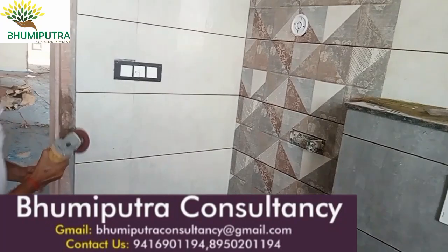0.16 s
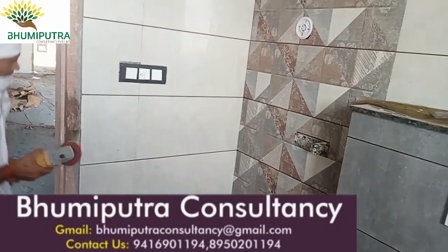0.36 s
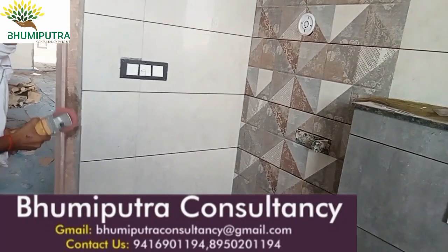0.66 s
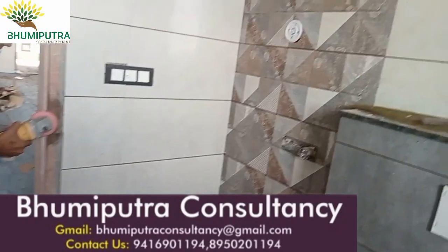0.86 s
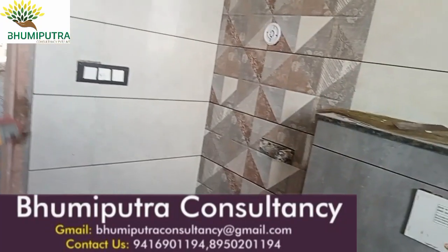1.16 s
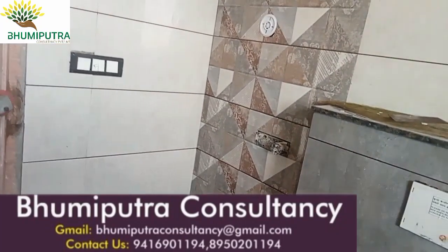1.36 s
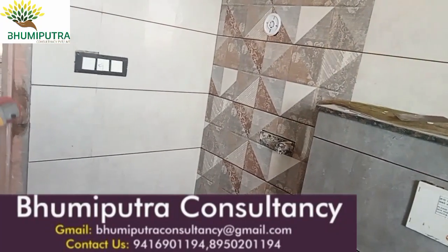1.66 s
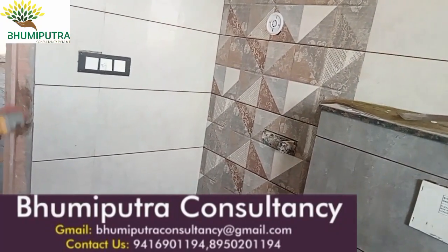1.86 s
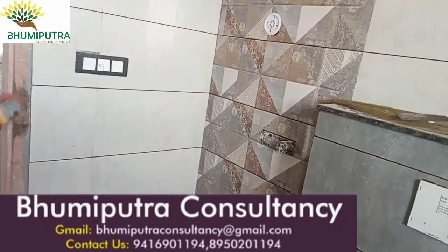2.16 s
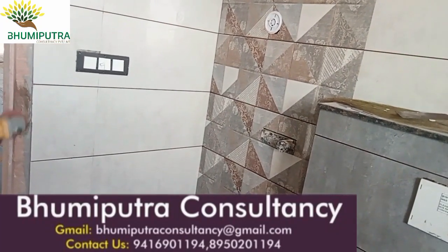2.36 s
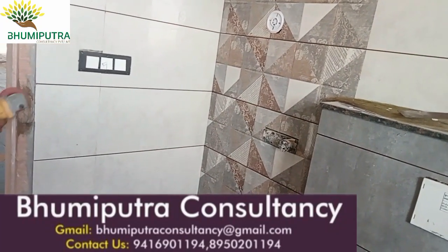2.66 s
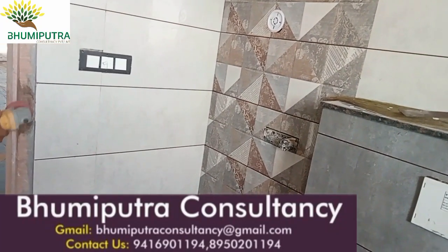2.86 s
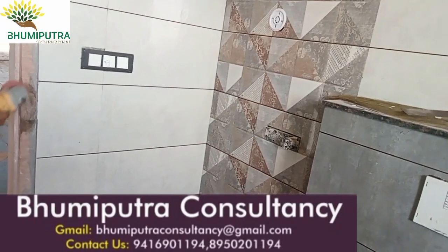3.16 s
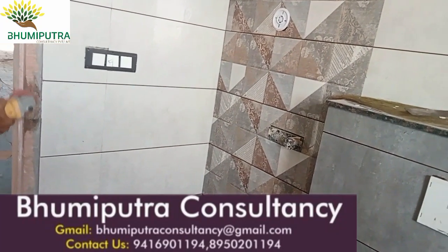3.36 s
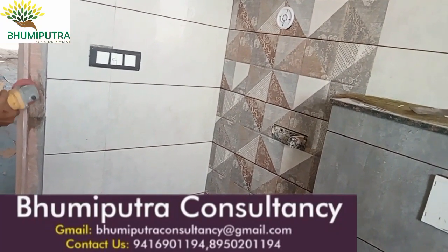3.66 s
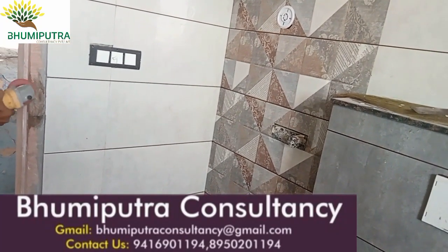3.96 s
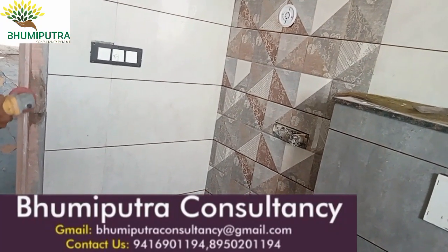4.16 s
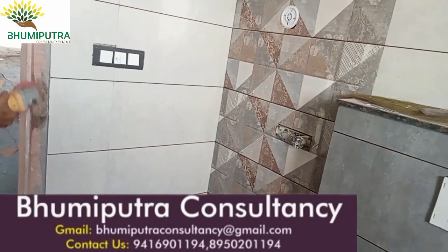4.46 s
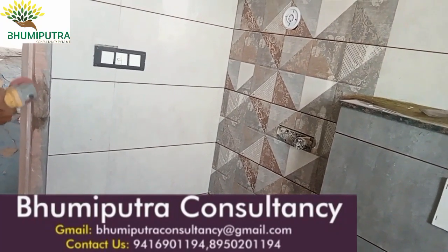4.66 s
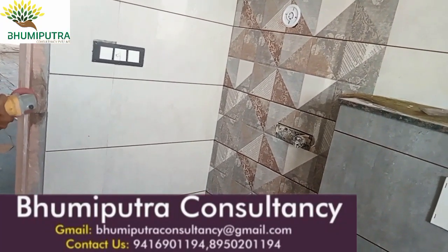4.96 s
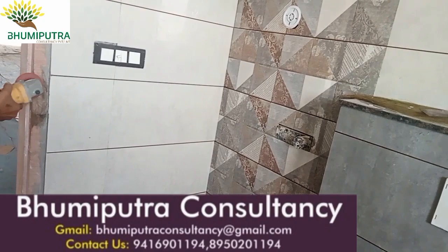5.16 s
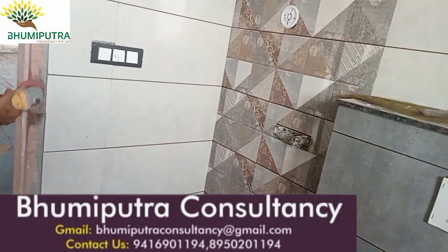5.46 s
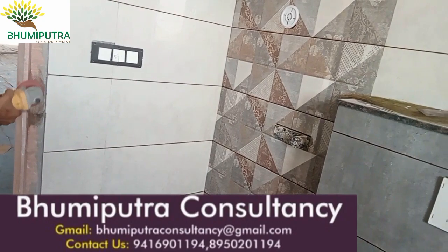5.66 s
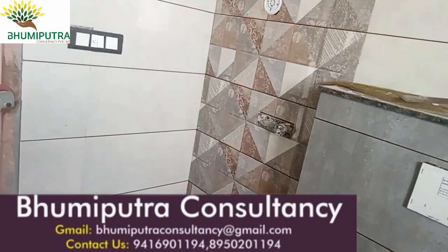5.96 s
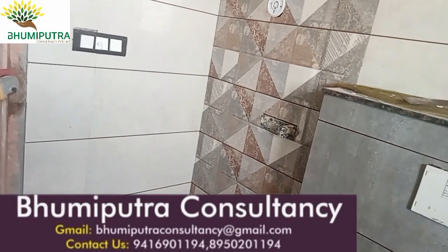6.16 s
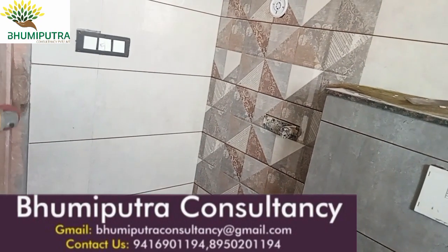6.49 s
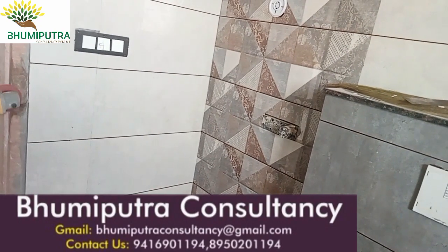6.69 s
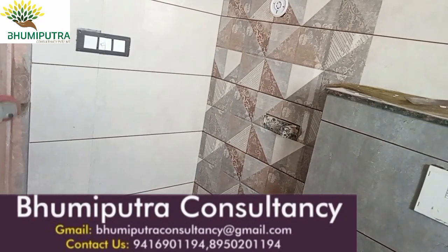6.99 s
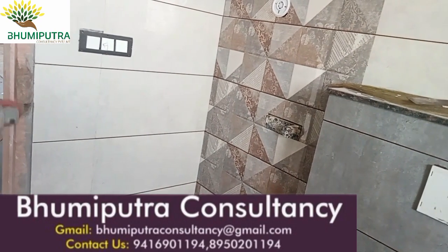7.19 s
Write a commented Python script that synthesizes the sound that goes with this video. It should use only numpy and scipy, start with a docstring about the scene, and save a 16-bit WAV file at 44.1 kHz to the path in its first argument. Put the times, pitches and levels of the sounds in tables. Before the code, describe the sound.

A harsh, hissing rasp of an abrasive disc on stone rings in a hard-walled room. The angle grinder's motor whines and squeals at first, then drops in pitch and recedes under load. The grinding swells with each push as irregular gusts rumble and thump on the nearby microphone. Late on, everything drops to silence for half a second before the grinding resumes.

```python
"""An angle grinder on a stone door frame in a tiled room, a metre or two from a handheld microphone.
From the start grit rasps on the stone and rings the disc, the motor whines and squeals, and air thrown
off the disc buffets the microphone in gusts. About a second and a half in, the disc bites behind the
frame's edge: the whine sags and fades, and the grinding surges with each push of the hand.
Near the end the sound cuts out for half a second, then the grinding is back."""
import sys
import numpy as np
from scipy import signal
from scipy.fft import rfft, irfft, next_fast_len
from scipy.io import wavfile
from scipy.ndimage import uniform_filter1d, map_coordinates

SR = 44100
rng = np.random.default_rng(int(sys.argv[2]) if len(sys.argv) > 2 else 0)


def inscribe(sig):
    """Save sig as 16-bit PCM at rate SR to the path in sys.argv[1].

    A 1-D sig is mono; a 2-D sig holds one channel per row.
    Samples are clipped to [-1, 1] before scaling.
    """
    pcm = np.round(np.clip(np.atleast_2d(sig).T, -1, 1) * 32767)
    wavfile.write(sys.argv[1], SR, pcm.astype(np.int16))


N = 323253
PADDED = next_fast_len(N, True)
TIME, FREQS = np.arange(N) / SR, np.fft.rfftfreq(PADDED, 1 / SR)


# Pushes of the hand on the disc. Each row: centre in seconds, surge in dB (negative as it eases off),
# half-length in seconds, extra fizz in dB as the rim digs.
HAND_PUSHES = [(.16, -1.5, .1, 1), (0.374, -0.3, .15, 0), (0.725, 0, 0.14, 1), (.94, 1, 0.19, 0),
               (1.136, 2, 0.038, -1.5), (1.24, -2, 0.063, 3), (1.435, 0.8, 0.078, 0.5),
               (1.587, 3, 0.089, -2.5), (1.77, 3, 0.1, -2.5), (1.996, 2, .07, 0.5), (2.165, 1.3, .06, -0.5),
               (2.474, 2, 0.16, 0.5), (2.8, 0.5, .06, -0.5), (2.982, 2.5, 0.18, -1.7), (3.215, 1, 0.076, 0),
               (3.47, 3, 0.088, 0), (3.61, 1.5, .08, 0), (3.84, 2.6, 0.045, 0), (3.97, 3, .06, -1.5),
               (4.293, 1, .11, 1.5), (4.685, 2.2, 0.17, 0.5), (4.93, 3, 0.067, -1.5), (5.137, 2, 0.12, 0.5),
               (5.3, -1.5, .05, -1.5), (5.435, 1, 0.11, 1.5), (6.09, 3.5, 0.09, -1), (6.253, -1, .06, -1.3),
               (6.37, 1.5, .07, 2), (6.586, 1, .06, 2), (6.69, 1.5, 0.076, -3), (6.8, 0, 0.074, -2.5),
               (6.957, 1.5, 0.11, .7), (7.097, 1.5, 0.086, -1.5), (7.19, -.5, .05, -4.5),
               (7.28, 1, 0.047, 0.5)]
# Low to high: rasp of the stone, ring of the disc, fizz of the grit. Each row: base level in dB, share
# of the surge, change in dB when in view, share of the extra fizz, share of the skimming loss.
GRINDING_BANDS = [(-22, 0.71, 1.4, 0.33, 0.78), (-19, 0.97, -2, -.1, -0.82), (-23.5, .7, 2.2, 1, -0.098)]

def grinding(turns, tremor_db=.03, set_down_s=.66, settle_s=.022, skim_db=-2):
    """The disc skims the stone, is set down flat, then rasps, rings and fizzes with each push."""
    grit = screeching(tiled_room(grit_strikes(turns)))
    colour = grinding_colour()
    above_stone, above_disc = (1 / (1 + (edge_hz / (FREQS + 1)) ** 16) for edge_hz in (4000, 7000))
    bands = 1 - above_stone, above_stone - above_disc, above_disc
    surge = sum(db * swell(s, length) for s, db, length, _ in HAND_PUSHES) + tremor_db * wander(12)
    fizz = sum(db * swell(s, length) for s, _, length, db in HAND_PUSHES)
    skim = skim_db * (1 - np.tanh((TIME - set_down_s) / settle_s)) / 2
    out = np.zeros(N)
    for (db, surge_share, view_db, fizz_share, skim_share), band in zip(GRINDING_BANDS, bands):
        level_db = db + surge_share * surge + view_db * in_view() + fizz_share * fizz + skim_share * skim
        out += gain_of(level_db) * steadied(coloured(grit, colour * band), size=5000)
    return out


def grit_strikes(turns, wobble=.062, gear_ratio=2.6, chatter_db=-.3):
    """Grit hits the stone, a little harder once in each turn of the disc."""
    contact = 1 + wobble * np.sin(2 * np.pi * turns / gear_ratio)
    chatter = gain_of(chatter_db * wander(59))
    return impacts(per_s=28000, spread_db=.95) * contact * chatter


# Disc on stone from a metre or two away. Each row: frequency in Hz, relative level in dB.
GRINDING_SPECTRUM = [(300, -28), (700, -21.5), (1100, -14.5), (1700, -12), (2300, -3), (3000, -6),
                     (3800, -5.5), (5550, 1.5), (6200, -3), (6750, -10), (7700, -14), (8900, -11.5),
                     (11500, -20), (15400, -24.5)]
# Resonances of guard, disc and frame. Each row: frequency in Hz, width in Hz, lift in dB.
BODY_RESONANCES = [(1319, 53, 5), (2420, 90, 0.7), (3650, 870, -0.5), (4340, 170, 1), (5860, 110, 2),
                   (5730, 130, 0), (6170, 160, 3.5), (8880, 520, 2.5), (10060, 670, 3), (13000, 910, 5)]

def grinding_colour():
    """Gain at each frequency: a broad scrape with the ringing of guard, disc and frame on top."""
    ringing_db = sum(db / (1 + (2 * (FREQS - hz) / width) ** 2) for hz, width, db in BODY_RESONANCES)
    return gain_of(read(GRINDING_SPECTRUM, FREQS) + ringing_db)


# Resonances that come and go at the contact point. Each row: frequency in Hz, half-width in Hz,
# random swing in dB, change in dB when in view.
CONTACT_FLARES = [(1860, 200, 0, 3), (2380, 200, 0.9, -2), (5110, 350, 1, 0.5), (6100, 250, 0.6, -2),
                  (7000, 354, .5, 4.5), (8960, 220, 1.2, 2.5), (10150, 250, 2.3, -2)]

def screeching(grit, patchy_db=1.38, screech_db=.2, bite_db=3.5, bite_hz=5480, open_db=1.0):
    """As the contact point moves, resonances flare and fade and the strongest scrape roams in pitch."""
    hz, t, spectrum = signal.stft(grit, SR, nperseg=512, noverlap=384)
    hz = hz[:, None]
    view = in_view()
    patches = uniform_filter1d(rng.standard_normal(spectrum.shape), size=4, axis=0)
    patches = evened(uniform_filter1d(patches, size=16, axis=1))
    db = patches * (patchy_db + screech_db * np.exp(-((hz - 5600) / 900) ** 2))
    # the scrape sits lower on the near face of the frame
    centre_hz = bite_hz + 200 * wander(4) - 220 * view
    bite = np.exp(-((hz - np.interp(t, TIME, centre_hz)) / 380) ** 2)
    db += bite_db * (bite - bite.mean(1, keepdims=True))
    for flare_hz, width, swing_db, view_db in CONTACT_FLARES:
        flare_db = np.interp(t, TIME, swing_db * wander(9) + view_db * view)
        db += flare_db * np.exp(-((hz - flare_hz) / width) ** 2)
    # the highest fizz reaches the microphone only in a straight line, so the frame shades it
    db += open_db * np.interp(t, TIME, view) / (1 + (12500 / (hz + 1)) ** 10)
    return signal.istft(spectrum * gain_of(db), nperseg=512, noverlap=384)[1][:N]


# The tool as seen from the microphone. Each row: time in seconds, openness from 0 (hidden) to 1.
LINE_OF_SIGHT = [(0, 0.9), (.3, 0.45), (.7, 1), (1.1, 0.45), (1.45, 0.9), (1.7, 0), (7.33, 0.01)]

def in_view():
    """How openly the tool faces the microphone before it slips behind the frame."""
    return np.interp(TIME, *np.transpose(LINE_OF_SIGHT))


# Tones of the motor, led by its 24 commutator bars. Each row: multiple of the rotor speed,
# relative level in dB, flutter from 0 to 1.
MOTOR_TONES = [(23, -24, 0.7), (24, 0, 0.3), (26, -29.5, .7)]
# Brief squeals; on multiple 24 the whine itself flares. Each row: centre in seconds, multiple of the
# rotor speed, level in dB, half-length in seconds, flutter from 0 to 1.
ROTOR_SQUEALS = [(0.098, 24, -20.5, .03, .15), (.137, 18.1, -22.5, .04, .8), (0.228, 24, -24.5, .06, 0.2),
                 (0.389, 17.2, -24, .13, 1), (0.453, 23, -24, .06, .7), (.65, 24, -21, .05, .15),
                 (.755, 24, -23, .02, .15), (.835, 24, -23, .025, .15), (1.02, 24, -26, .03, .2),
                 (1.21, 24, -29.5, .04, .2)]

def motor(turns, hidden_db=-41, view_lift_db=17):
    """Whine and squeals locked to the rotor; the whine is loudest with the tool in view."""
    whine = sum(gain_of(db) * fluttering(order * turns, flutter, flutter_hz=25)
                for order, db, flutter in MOTOR_TONES)
    squeals = sum(gain_of(db) * swell(s, length) * fluttering(order * turns, flutter, flutter_hz=70)
                  for s, order, db, length, flutter in ROTOR_SQUEALS)
    return gain_of(hidden_db + view_lift_db * np.sqrt(in_view())) * whine + squeals


# Speed of the rotor. Each row: time in seconds, turns per second.
ROTOR_SPEED = [(0, 392.6), (.3, 395.9), (.6, 397.2), (1.17, 397.2), (1.3, 391), (1.43, 386), (1.55, 378),
               (1.9, 370), (3.8, 364), (7.33, 367)]

def rotor_turns(jitter=.0006):
    """Running count of turns as the rotor spins freely, then sags under load."""
    speed = np.interp(TIME, *np.transpose(ROTOR_SPEED))
    return np.cumsum(speed * (1 + jitter * wander(40))) / SR


# Air from the disc sweeping over the microphone. Each row: centre in seconds, relative level in dB,
# half-length in seconds.
AIR_GUSTS = [(0, -19, 0.067), (0.188, -22, 0.23), (0.344, -23, 0.04), (0.442, -22.5, 0.14),
             (0.654, -23, 0.075), (0.756, -22, 0.037), (0.864, -33.5, 0.13), (1.215, -24, 0.12),
             (1.352, -23, .06), (1.523, -32.5, 0.13), (2.08, -28, 0.036), (2.528, -21.5, 0.067),
             (2.635, -24.5, 0.064), (3.024, -25.5, .04), (3.193, -31, 0.13), (3.536, -23.5, 0.17),
             (3.873, -27.5, 0.059), (3.99, -28.5, 0.078), (4.101, -28, 0.019), (4.306, -25.5, .029),
             (4.372, -23, 0.044), (4.55, -37.5, 0.11), (4.7, -25, .03), (4.8, -33.5, 0.11),
             (5.118, -24.5, 0.044), (5.198, -27, 0.036), (5.476, -27.5, 0.07), (6.062, -27.5, 0.079),
             (6.149, -24, 0.032), (6.353, -33.5, 0.051), (6.452, -23.5, 0.027), (6.567, -22.5, 0.082),
             (6.955, -30, 0.06)]

def gusts(eddies, trim_db=-1.5, lumpy_db=1.9, rush_db=-3, rush_hz=700, coarse_db=-.5):
    """Lumpy gusts of large eddies; fast air straight from the disc adds fine ones, heard as a rush."""
    power = sum((gain_of(db + trim_db) * swell(s, length)) ** 2 for s, db, length in AIR_GUSTS)
    strength = np.sqrt(power) * gain_of(lumpy_db * wander(24))
    rush = evened(coloured(rng.standard_normal(N), np.exp(-np.log((FREQS + 1) / rush_hz) ** 2)))
    view = in_view()
    return strength * (gain_of(coarse_db * view) * eddies + gain_of(rush_db) * view * rush)


# The hardest blows of air on the microphone. Each row: start in seconds, relative strength in dB.
AIR_BLOWS = [(1.189, -3), (1.395, -7), (1.546, -9), (2.358, -11.5), (2.528, -9.5), (2.811, -11.5),
             (3.398, -8), (3.468, -1), (3.649, -2), (3.686, -5), (3.811, -10), (4.3, -6.5), (4.369, -19.5),
             (4.689, -6.5), (5.437, -10.5), (6.148, -8), (6.543, -5), (6.597, -6), (6.964, -4.5),
             (7.097, -12)]

def blows(thump, trim_db=-2, cutoff_hz=650):
    """Single large eddies land on the microphone, each with a dull thud."""
    s, db = np.transpose(AIR_BLOWS)
    hits = np.bincount((s * SR).astype(int), gain_of(db + trim_db), N)
    return dulled(signal.oaconvolve(hits, thump / abs(thump).max())[:N], cutoff_hz)


# One eddy right at the microphone. Each row: frequency in Hz, relative level in dB.
EDDY_SPECTRUM = [(15, -53), (35, -26), (70, -0.5), (135, 1), (250, -2), (450, -4), (800, -7.5), (1150, -11),
                 (1600, -19.5), (3000, -74)]

def eddy_thump():
    """The pressure pulse of one eddy, minimum-phase so that it starts abruptly."""
    log_gain = np.log(gain_of(read(EDDY_SPECTRUM, abs(np.fft.fftfreq(4096, 1 / SR)))))
    return np.fft.ifft(np.exp(np.conj(signal.hilbert(log_gain)))).real[:2048]


def turbulence(thump):
    """A stream of eddies with steady energy, whether a few large ones or many small ones."""
    return steadied(signal.oaconvolve(impacts(per_s=500, spread_db=4), thump)[:N], size=1500)


def draught(eddies, start_db=-34, fall_db_per_s=3.4, fitful_db=3):
    """Slow, dull air between the gusts, dying away as the tool moves off."""
    level_db = start_db - fall_db_per_s * TIME + fitful_db * wander(14)
    return gain_of(level_db) * evened(dulled(eddies, cutoff_hz=330))


def tiled_room(x, echo_db=-12, sway_s=.000273, tail_db=-4, t60_s=1.0):
    """Hard walls: early echoes whose paths shift as the tool moves, then an ever-changing tail."""
    out = x.copy()
    for delay_s in np.geomspace(.0015, .024, num=7):
        path_s = delay_s * rng.uniform(.85, 1.15) + sway_s * wander(.906)
        out += gain_of(echo_db) * map_coordinates(x, [(TIME - path_s) * SR], order=3, mode="wrap")
    t = TIME[:SR // 2]
    shares = np.array([wander(2.6) for _ in range(5)])
    for share in shares / np.linalg.norm(shares, axis=0):
        tail = rng.standard_normal(len(t)) * gain_of(-60 * t / t60_s) * (t > .01)
        out += gain_of(tail_db) * share * np.std(x) * evened(coloured(x, rfft(tail, PADDED)))
    return out


def impacts(per_s, spread_db):
    """Clicks of random sign and size at random moments."""
    size = gain_of(spread_db * np.minimum(rng.exponential(1, N), 4))
    return size * rng.choice([-1, 1], N) * (rng.random(N) < per_s / SR)


def fluttering(cycles, flutter, flutter_hz):
    """A tone whose strength and phase waver."""
    fading = 1 - flutter + flutter * (wander(flutter_hz) + 1j * wander(flutter_hz)) / np.sqrt(2)
    return evened((fading * np.exp(2j * np.pi * cycles)).real)


def swell(s, half_length):
    """A bell-shaped rise and fall around the time s."""
    return np.exp(-2 * np.minimum(((TIME - s) / half_length) ** 2, 20))


def wander(hz):
    """Random drift of rms 1, mostly slower than hz."""
    return evened(coloured(rng.standard_normal(N), np.exp(-(FREQS / hz) ** 2) * (FREQS > 0)))


def coloured(x, gain):
    """Filters by a gain for each frequency."""
    return irfft(rfft(x, PADDED) * gain, PADDED)[:N]


def dulled(x, cutoff_hz):
    """One-pole low-pass."""
    return coloured(x, 1 / (1 + 1j * FREQS / cutoff_hz))


def read(points, hz):
    """A spectrum in dB, joined by straight lines on a log-frequency axis."""
    f, db = np.transpose(points)
    return np.interp(np.log(hz + 1), np.log(f + 1), db)


def steadied(x, size):
    """Holds the rms at 1 over stretches of size samples."""
    return x / np.sqrt(abs(uniform_filter1d(x ** 2, size=size)) + 1e-12)


def evened(x):
    """Scales to rms 1."""
    return x / np.sqrt(np.mean(x ** 2) + 1e-20)


def gain_of(db):
    """Decibels to amplitude."""
    return 10 ** (np.asarray(db) / 20)


def scene():
    """Grinding, motor and moving air meet at one microphone, the same in both channels."""
    turns = rotor_turns()
    thump = eddy_thump()
    eddies = turbulence(thump)
    mono = grinding(turns) + motor(turns) + gusts(eddies) + blows(thump) + draught(eddies)
    return np.array([mono, mono])


def record(dry, knee=.55, headroom=.22, cut_s=5.5232, return_s=6.0102, edge_hz=15550):
    """The highest peaks are rounded off, the sound cuts out and returns, and the top treble is lost."""
    below = np.clip(dry, -knee, knee)
    rounded = below + headroom * np.tanh((dry - below) / headroom)
    running = uniform_filter1d(1. * ((TIME < cut_s) | (TIME > return_s)), size=40)
    low_pass = signal.firwin(701, edge_hz, window=("kaiser", 9), fs=SR)
    return signal.oaconvolve(rounded * running, low_pass[None], "same")


dry = scene()
out = record(dry)
inscribe(out)
```